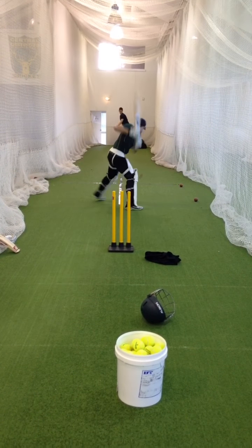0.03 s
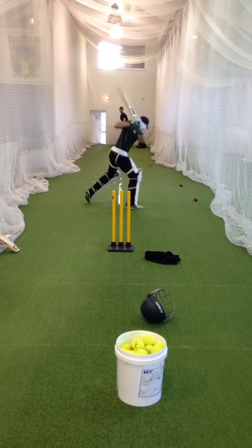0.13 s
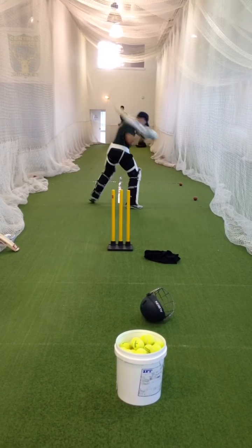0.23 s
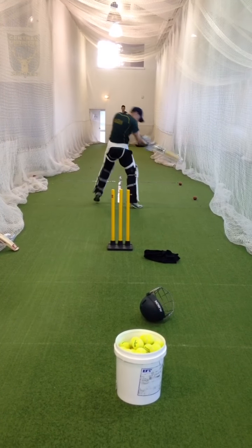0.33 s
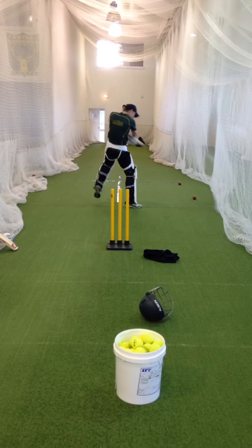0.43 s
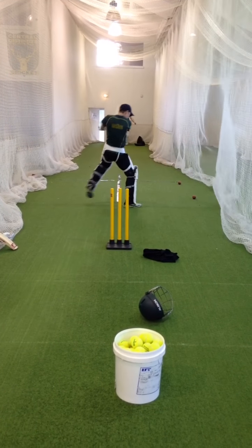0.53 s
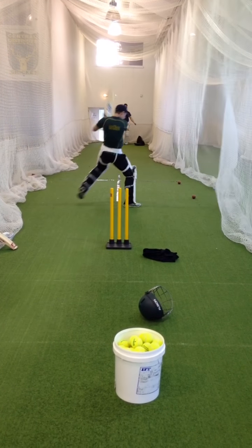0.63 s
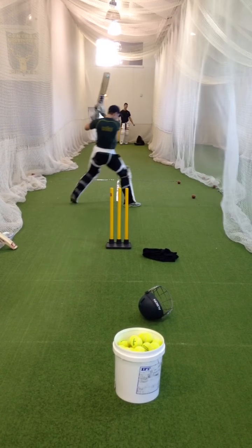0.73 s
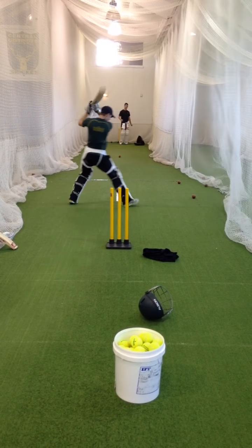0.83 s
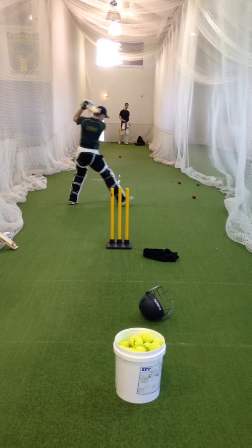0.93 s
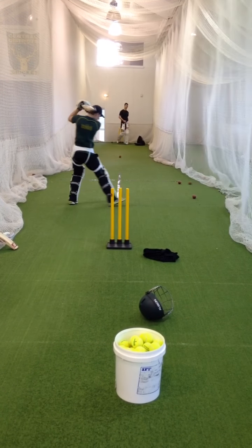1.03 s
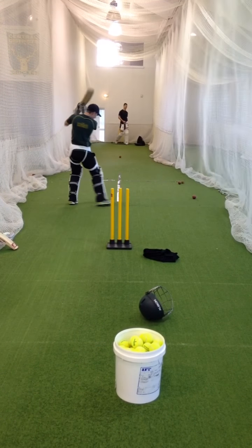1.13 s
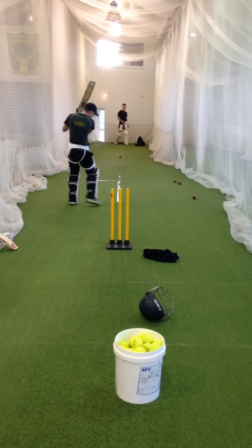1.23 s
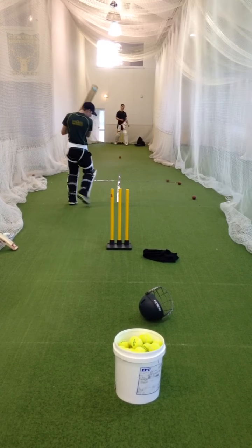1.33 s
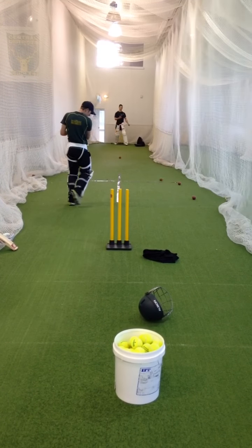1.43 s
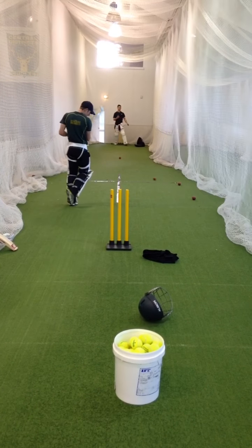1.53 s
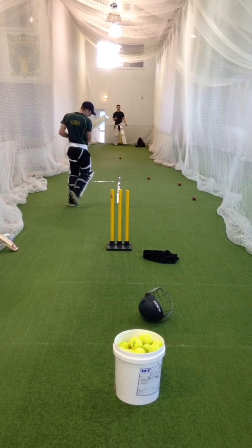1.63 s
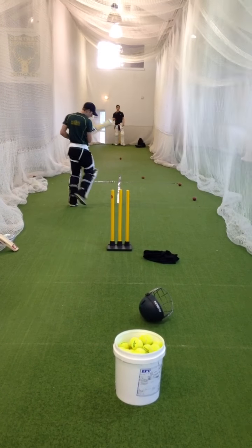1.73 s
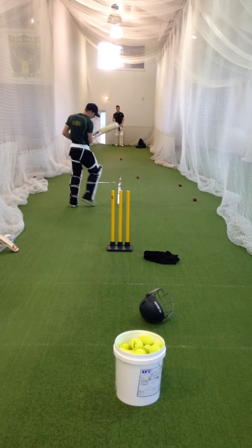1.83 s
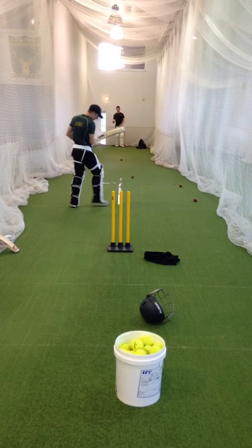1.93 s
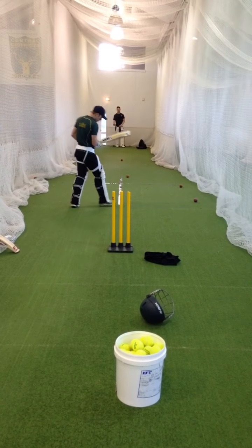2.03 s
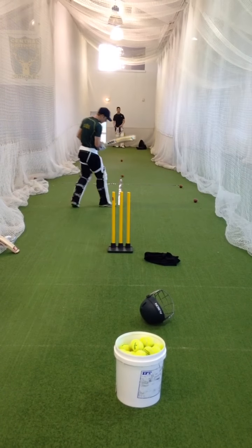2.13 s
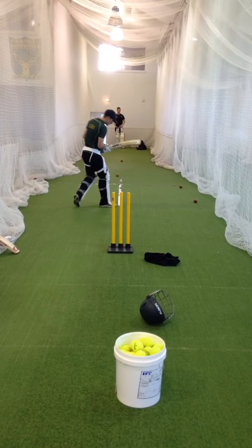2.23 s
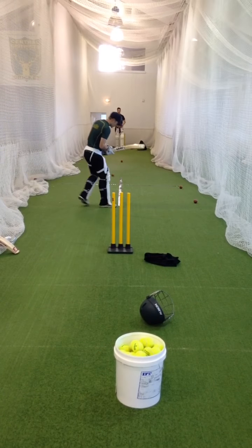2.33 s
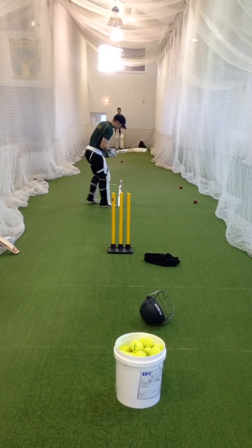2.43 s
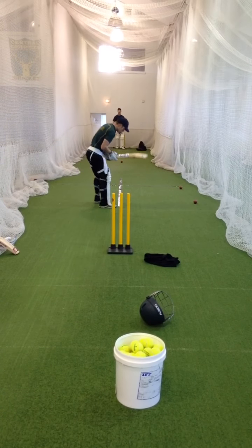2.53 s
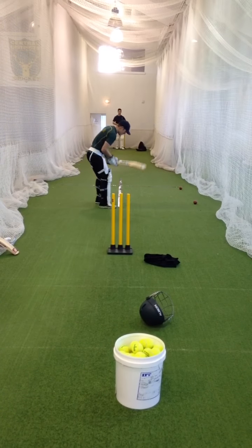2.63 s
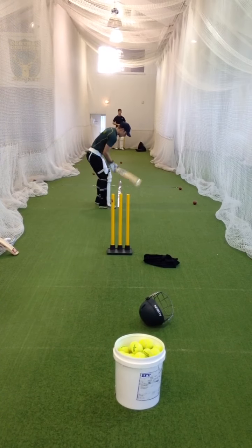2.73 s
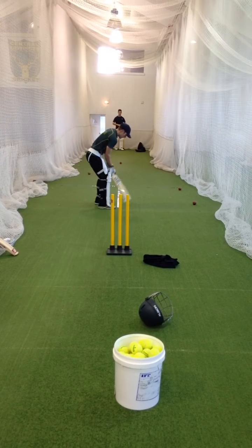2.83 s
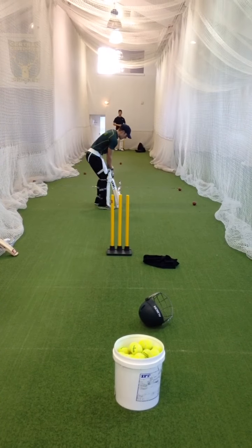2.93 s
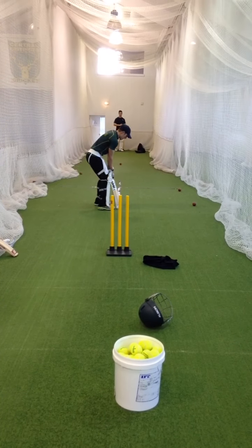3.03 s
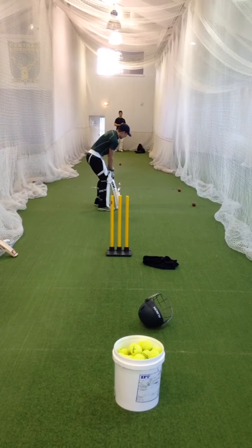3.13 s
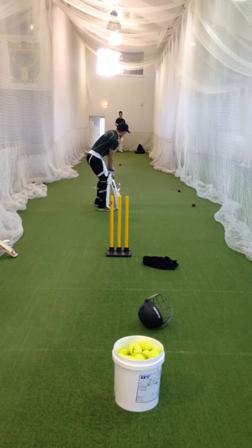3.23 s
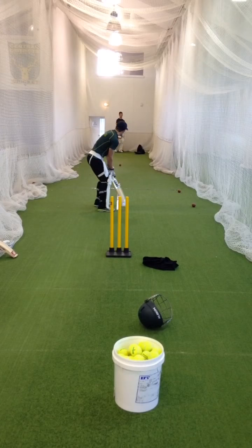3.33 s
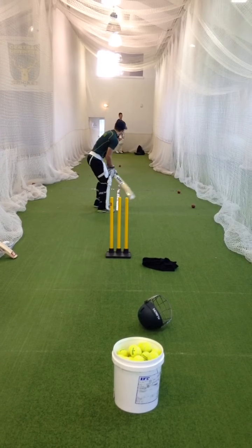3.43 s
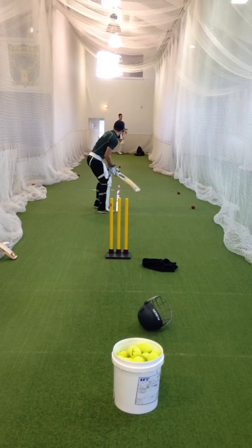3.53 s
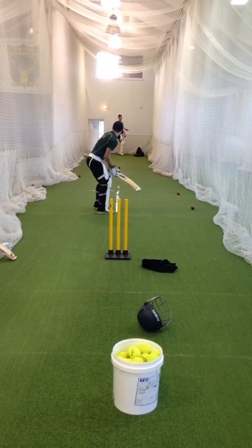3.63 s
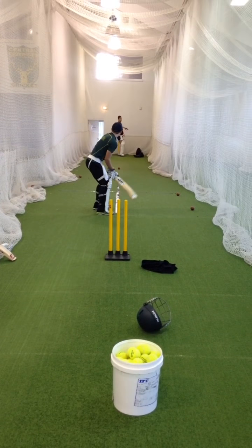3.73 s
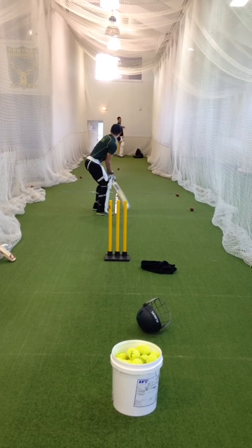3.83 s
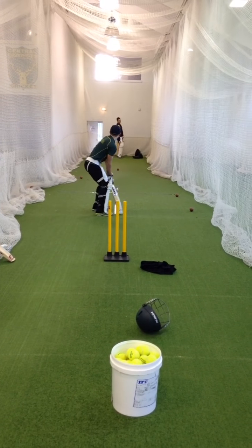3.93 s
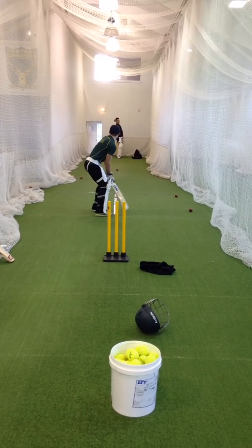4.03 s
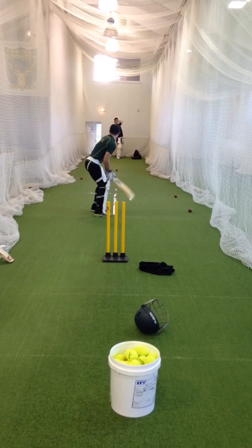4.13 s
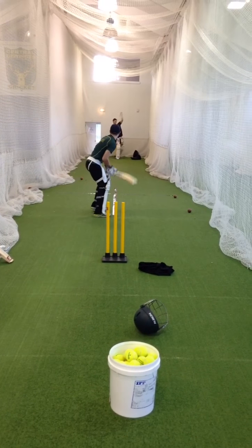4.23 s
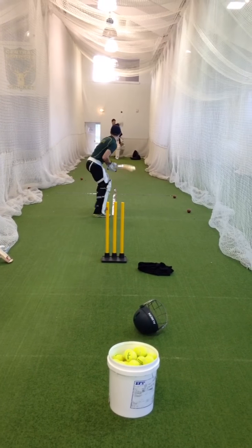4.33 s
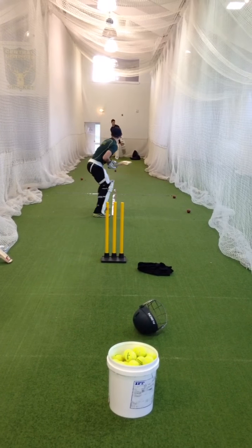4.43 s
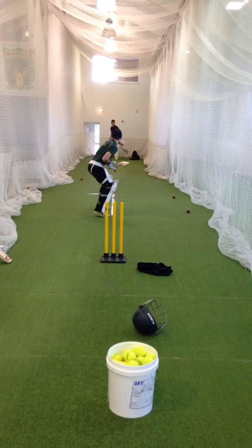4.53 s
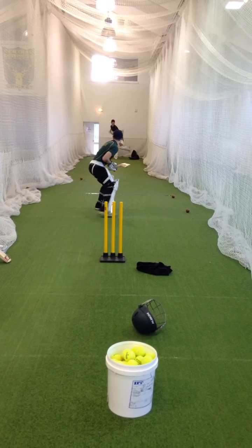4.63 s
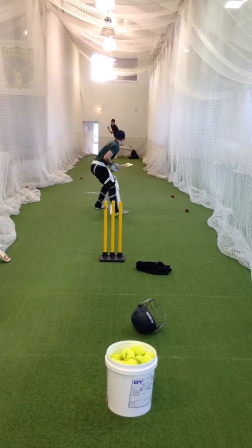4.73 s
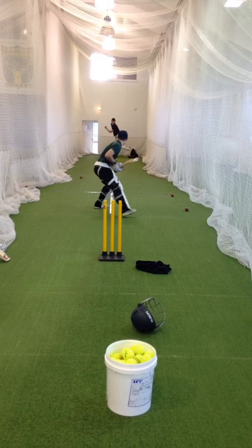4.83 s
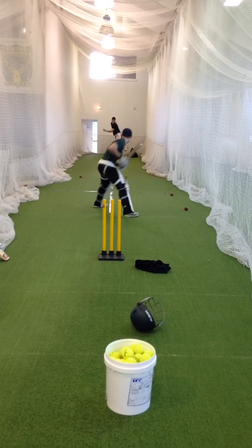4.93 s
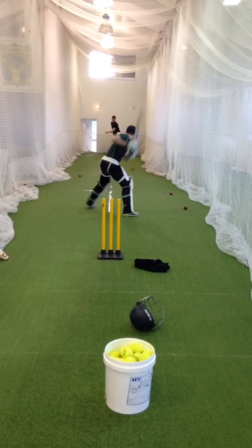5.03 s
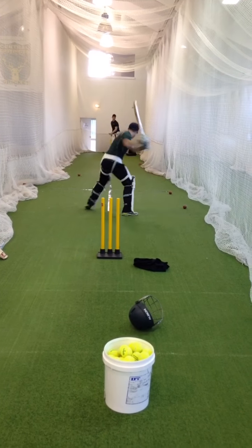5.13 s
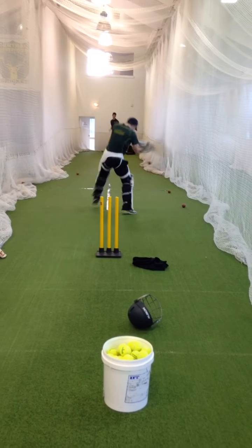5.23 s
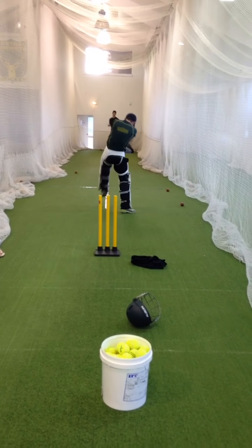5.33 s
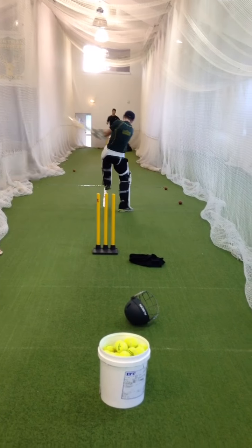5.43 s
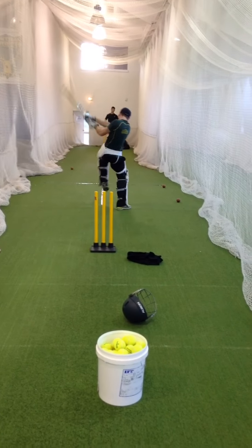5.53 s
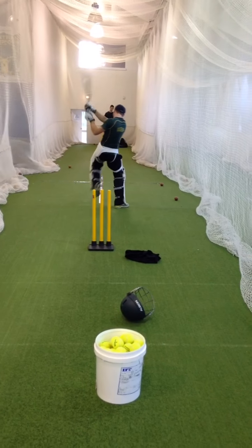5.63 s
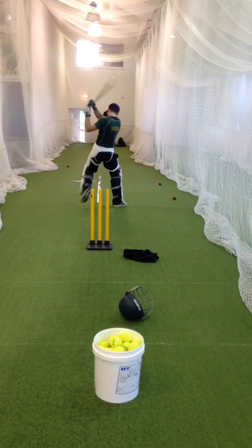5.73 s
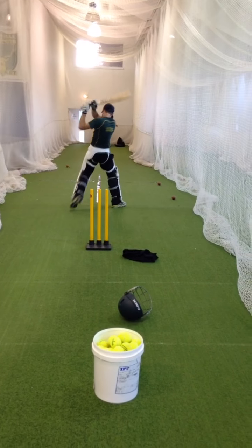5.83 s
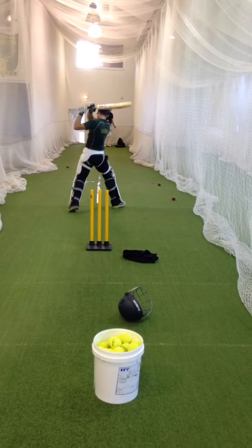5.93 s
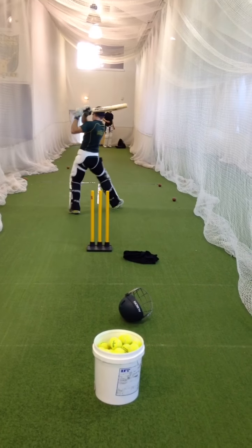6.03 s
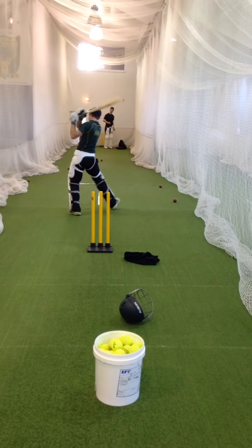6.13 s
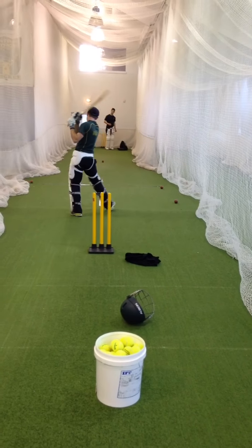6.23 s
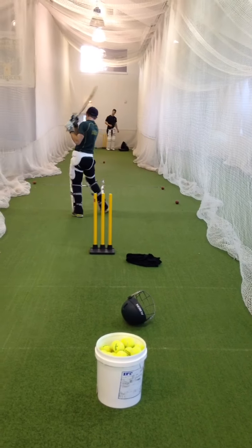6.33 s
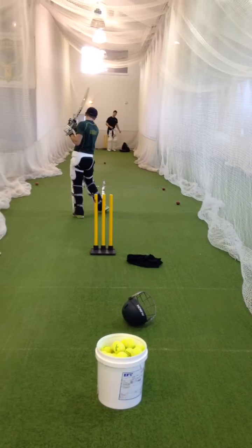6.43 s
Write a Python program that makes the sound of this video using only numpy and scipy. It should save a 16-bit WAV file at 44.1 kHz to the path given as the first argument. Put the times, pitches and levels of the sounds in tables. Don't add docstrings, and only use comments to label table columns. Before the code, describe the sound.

In a long, echoing netted hall, a ball pitches with a low boom on turf over a hollow floor, then a cricket bat cracks it loudly. Slapping echoes and a long tail fade under faint footsteps and scuffs. The bat taps the floor firmly, then more softly, before a second boom and crack. One microphone a few metres behind the batter; ventilation hums quietly.

```python
import sys
import numpy as np
from scipy import signal
from scipy.fft import rfft, irfft, next_fast_len
from scipy.io import wavfile
from scipy.ndimage import uniform_filter1d

SR = 44100
rng = np.random.default_rng(int(sys.argv[2]) if len(sys.argv) > 2 else 0)


def voltage_ratio(decibels):
    exponent = np.asarray(decibels, float) / 20
    return 10 ** exponent


def transcribe(signal):
    frames = np.atleast_2d(signal).T
    limited = np.clip(frames, -1, 1)
    pcm = np.round(limited * 32767).astype(np.int16)
    wavfile.write(sys.argv[1], SR, pcm)


N = 286164

# arrival in seconds, peak in dB.
FIRST_CRACK = [
    (0.4219, 1),
    (0.4233, 2),
    (.4305, -8),
    (.435, -3.5),
    (.438, -5.5),
    (0.457, -7.5),
    (0.483, -6),
    (.524, -6),
]
SECOND_CRACK = [
    (5.3706, 3),
    (5.372, -1),
    (5.3788, 0.5),
    (5.3833, 0),
    (5.3855, -6),
    (5.418, -8),
    (5.4424, -12),
    (5.4658, -5),
    (5.469, -10),
]
# frequency in Hz, level in dB per Hz.
FIRST_CRACK_COLOUR = [(260, -34.5), (450, -9.5), (1140, -10.5), (1470, -8), (1920, -21), (2470, -16.5),
                      (2910, -28.5), (10700, -39.5), (14800, -50.5), (16000, -78)]
SECOND_CRACK_COLOUR = [(260, -42), (450, -9), (607, -5.5), (1010, -8), (1420, -7), (2790, -22.5),
                       (4490, -26), (13600, -39), (15300, -53), (16000, -89)]
# frequency in Hz, width in Hz, lift in dB.
FIRST_BLADE = [(750, 290, 4.5), (1400, 280, 6.5), (2250, 210, 1.5), (3800, 1100, 10)]
SECOND_BLADE = [(680, 310, 3), (1400, 320, 2.5), (2450, 250, 4), (3900, 770, 2)]


def cracks():
    first = blow(-knock(FIRST_CRACK_COLOUR, FIRST_BLADE), blurred(FIRST_CRACK, late_ms=3.0),
                 tail(rise_s=0.0089, hold_s=0.17, mixing_s=0.08, patchy_db=2.5),
                 tail_db=-28.0, floor_lead_db=-57, split_hz=1500, treble_db=2.0)
    second = blow(knock(SECOND_CRACK_COLOUR, SECOND_BLADE), blurred(SECOND_CRACK, late_ms=1.8),
                  tail(rise_s=0.024, hold_s=0.15, mixing_s=0.12),
                  tail_db=-28.5, floor_lead_db=-38, split_hz=1100, treble_db=0.6)
    return first + second


def blurred(arrivals, late_ms):
    sharp_ms, blur_s = 0.5, 0.0057
    first_s = arrivals[0][0]
    return [(s, db, sharp_ms + late_ms * (1 - np.exp(-(s - first_s) / blur_s))) for s, db in arrivals]


# start in seconds, peak in dB, fade of its echoes in dB per second.
PITCHES = [
    (0.098, -3.5, 16.5),
    (4.9905, -5.5, 71),
]
# frequency in Hz, level in dB per Hz.
FIRST_PITCH_COLOUR = [(18, -54), (30, -18.5), (82, -8), (167, -1), (283, 1), (326, 3), (424, -2.5),
                      (456, -4.5), (717, -20), (808, -17), (1160, -28.5), (1470, -42), (9000, -79.5),
                      (11700, -107), (19800, -120)]
SECOND_PITCH_COLOUR = [(18, -45), (30, -14), (126, -3.5), (175, -0.5), (276, -1.5), (368, -2.5), (414, -9),
                       (607, -10), (684, -21), (868, -18), (1650, -45.5), (2360, -51.5), (9000, -85),
                       (11700, -102), (19800, -120)]


def pitches():
    first = blow(knock(FIRST_PITCH_COLOUR, [(1160, 200, 2.9)]), flutter(*PITCHES[0], count=7),
                 tail(rise_s=0.0013, hold_s=0.15, mixing_s=0.056, patchy_db=0.7),
                 tail_db=-28.5, floor_lead_db=-37, split_hz=1150, treble_db=-10.0)
    second = blow(knock(SECOND_PITCH_COLOUR, [(1070, 400, 1.8)]), flutter(*PITCHES[1], count=7),
                  tail(rise_s=0.0064, hold_s=0.13, mixing_s=0.05, patchy_db=1.5),
                  tail_db=-31, floor_lead_db=-33.5, split_hz=800, treble_db=2.5)
    return first + second


def flutter(s, db, fade_db_per_s, count):
    turf_s, wall_s, round_s, scatter_ms = 0.009, 0.026, 0.0215, 6.0
    lags = np.r_[0, turf_s, wall_s + round_s * np.arange(count)]
    return [(s + lag, db - fade_db_per_s * lag - 2.5 * (k % 2), scatter_ms) for k, lag in enumerate(lags)]


# start in seconds, peak in dB, favoured note in Hz, its lift in dB.
TAPS = [
    (2.994, -14, 305, 2.5),
    (3.999, -23.5, 121, 4),
]
# delay in seconds, level in dB.
TAP_ECHOES = [(0, 0), (0.027, 1), (0.047, -0.5), (.064, 1.5), (.088, 0.5), (0.12, -0.5), (0.152, 1.5),
              (.212, -3.5), (.234, -6), (0.29, -19)]
# frequency in Hz, level in dB per Hz.
TAP_COLOUR = [(18, -52), (30, -25), (49, -5), (80, -4), (185, 1), (250, -5.5), (278, -7.5), (359, -13.5),
              (475, -29.5), (528, -32.5), (1120, -49.5), (5000, -64.5), (6500, -81), (11000, -120)]


def taps():
    response = tail(rise_s=0.0099, hold_s=0.046, mixing_s=0.1, patchy_db=1.2)
    out = np.zeros(N)
    for s, db, hz, lift_db in TAPS:
        pulse = knock(TAP_COLOUR, [(hz, 0.96 * hz, lift_db)])
        arrivals = [(s + lag, db + echo_db, 3.9 + 100 * lag) for lag, echo_db in TAP_ECHOES]
        out += blow(pulse, arrivals, response, tail_db=db - 27.5, floor_lead_db=db - 35.0,
                    split_hz=690, treble_db=-11)
    return out


# start in seconds, peak in dB, note in Hz.
RINGS = [(0.0983, -17, 890), (.104, -6, 380), (1.799, -43, 2120), (2.996, -46, 1230), (2.9936, -14, 179),
         (3.007, -34, 711), (3.9985, -19, 165), (4.287, -28, 81.4), (4.515, -48, 2210), (4.652, -51, 1480),
         (4.99, -15, 954), (5.001, -5, 544)]
# start in seconds, note in dB, bright overtone in dB.
SLAPS = [
    (.4222, -5, -30),
    (.437, -15, -11),
    (.483, -30, -19.5),
    (5.3701, -1, -28),
    (5.3831, -4, -33),
    (5.443, -32, -12),
    (5.468, -30, -15),
]


def rings():
    t = np.arange(4096) / SR
    partials = [(s, db, hz, 0.023) for s, db, hz in RINGS]
    for s, note_db, bright_db in SLAPS:
        for db, hz in [(note_db, 1200), (bright_db, 4230), (bright_db - 7.5, 7700)]:
            partials.append((s, db, hz, 0.021))
    out = np.zeros(N)
    for s, db, hz, t60_at_1k in partials:
        t60 = t60_at_1k * (1000 / hz) ** 0.65
        onset = np.minimum(t * hz * 1.4, 1)
        i = round(s * SR)
        out[i:i + len(t)] += voltage_ratio(db - 60 * t / t60) * np.sin(2 * np.pi * hz * t) * onset
    return out


def knock(colour, modes=()):
    hz = np.fft.rfftfreq(8192, 1 / SR)
    db = at_hz(colour, hz)
    for mode_hz, width_hz, lift_db in modes:
        db = db + lift_db / (1 + (2 * (hz - mode_hz) / width_hz) ** 2)
    cepstrum = irfft(np.log(voltage_ratio(db)))
    cepstrum[1:4096] *= 2
    cepstrum[4097:] = 0
    pulse = irfft(np.exp(rfft(cepstrum)))
    return pulse / np.abs(pulse).max()


def blow(pulse, arrivals, response, tail_db, floor_lead_db, split_hz, treble_db):
    at = [round(row[0] * SR) for row in arrivals]
    ms = np.arange(2048) * 1000 / SR
    clean, scattered = np.zeros(N), np.zeros(N)
    for i, (s, db, scatter_ms) in zip(at, arrivals):
        clean[i] = voltage_ratio(db)
        spread = rng.standard_normal(len(ms)) * np.exp(-ms / max(scatter_ms, 0.05))
        scattered[i:i + len(ms)] += voltage_ratio(db + treble_db) * spread / np.linalg.norm(spread)
    clicks = bandpass(clean, 18, split_hz) + bandpass(scattered, split_hz, SR / 2)
    start = at[0]
    span = min(len(response), N - start)
    clicks[start:start + span] += voltage_ratio(tail_db) * response[:span]
    lead = np.arange(min(start, 2000))
    swell = rng.standard_normal(len(lead)) * np.exp(-lead / (0.005 * SR))
    clicks[start - 1 - lead] += voltage_ratio(floor_lead_db) * swell
    return signal.fftconvolve(clicks, pulse)[:N]


# frequency in Hz, t60 in seconds.
HALL_T60 = [(40, 1.6), (90, 1.5), (130, 0.74), (200, 1.05), (350, 1.596), (700, 1.52), (1400, 1.364),
            (2800, 1.047), (5600, 0.66), (11000, 0.14), (16000, 0.32)]


def tail(rise_s, hold_s, mixing_s, patchy_db=2.0):
    count = 2 ** 17
    t = np.arange(count) / SR
    share = np.clip(0.12 + (t / mixing_s) ** 2, 0, 1)
    sparse = rng.standard_normal(count) * (rng.random(count) < share) / np.sqrt(share)
    hz, s, frames = signal.stft(sparse, SR, nperseg=512)
    hz = hz[:, None]
    hold = hold_s * np.clip(hz / 330, 0.4, 1) / (1 + hz / 30000)
    late = hold / 4 * np.logaddexp(0, 4 * (s - hold) / hold)
    common = rng.standard_normal(len(s))
    own = uniform_filter1d(rng.standard_normal(frames.shape), size=16, axis=0) * 4
    bunching_db = patchy_db * (common + 0.35 * own) * np.exp(-s / 0.48)
    fall_db = 60 * late / at_hz(HALL_T60, hz + 30)
    beyond_db = -20 - 0.6 * fall_db * (1000 / (hz + 300)) ** 0.12
    frames = frames * voltage_ratio(bunching_db) * (voltage_ratio(-fall_db) + voltage_ratio(beyond_db))
    return signal.istft(frames, SR)[1][:count] * (1 - np.exp(-t / rise_s))


# moment in seconds, peak in dB, length in seconds, board note in Hz.
STEPS = [(.004, -50, .02, 100), (.95, -45.5, .04, 86), (1.097, -51, .06, 80), (1.299, -42.5, .04, 75),
         (1.446, -46, 0.076, 75.8), (1.75, -56.5, 0.14, 120.2), (1.93, -55.5, 0.074, 68),
         (2.072, -52, 0.06, 76.5), (2.252, -58, 0.032, 100), (2.4, -58, 0.11, 110),
         (2.52, -57.5, 0.039, 68), (2.721, -52.5, 0.049, 100.2), (2.83, -48, 0.046, 100),
         (3.76, -61, .04, 70.1), (3.967, -57, .015, 90), (4.27, -44.5, .03, 85), (4.416, -53, 0.035, 80),
         (4.599, -55.5, .05, 45), (4.79, -70, .04, 80), (5.642, -47, .04, 89), (5.856, -62, .02, 80),
         (6.078, -47.5, 0.046, 90), (6.44, -49, 0.047, 90)]


def tread():
    t = np.arange(N) / SR
    rumble = voltage_ratio(-3.5) * rms_one(bandpass(rng.standard_normal(N), 55, 140))
    out = np.zeros(N)
    for s, db, length, hz in STEPS:
        away = np.where(t < s, (s - t) / 0.85, t - s)
        weight = uniform_filter1d(np.exp(-away / length), size=600)
        out += voltage_ratio(db) * weight * (rumble + np.sin(2 * np.pi * hz * (t - s)))
    return out


# start in seconds, level in dB, centre in Hz, length in seconds.
SCUFFS = [(0.375, -53, 2540, 0.015), (.389, -50, 4500, 0.0048), (0.409, -42.5, 3000, 0.012),
          (1.25, -54, 222, 0.037), (1.39, -53.5, 3700, 0.0091), (1.442, -55, 2000, 0.011),
          (1.695, -53, 7500, 0.0097), (1.693, -54, 2590, .004), (1.706, -58.5, 2600, 0.015),
          (1.798, -49, 1300, .004), (1.9, -58.5, 2600, 0.05), (2.027, -55, 3400, 0.022),
          (2.045, -57, 1500, .04), (2.067, -60, 378, 0.048), (4.109, -65.5, 1800, 0.018),
          (4.35, -64, 3900, .006), (4.515, -56, 4500, 0.0038), (4.638, -61.5, 4500, 0.015),
          (4.651, -51.5, 1400, 0.016), (4.655, -56, 520, 0.03), (4.748, -62, 800, 0.04),
          (5.032, -52, 4500, .006), (5.082, -56.5, 2300, 0.028), (5.166, -53.5, 3000, .015),
          (5.249, -62, 5000, .05), (5.36, -44, 3000, 0.0066), (6.075, -62.5, 5000, .04),
          (6.293, -61.5, 4000, .08), (6.38, -58.5, 1400, 0.13), (6.4, -52.5, 200, .08)]
# delay in seconds, level in dB, centre in Hz, length in seconds.
GRIT = [
    (.002, 0, 3000, 0.0066),
    (0.019, -3.5, 2100, 0.076),
    (0.041, -12, 4800, 0.026),
]
# start in seconds, level in dB.
GRIT_BLOWS = [
    (.098, -46),
    (2.996, -58),
    (4.022, -62.5),
    (4.992, -48),
]


def scuffs():
    t = np.arange(8192) / SR
    thrown = [(s + lag, db + part_db, hz, length) for s, db in GRIT_BLOWS for lag, part_db, hz, length in GRIT]
    out = np.zeros(N)
    for s, db, hz, length in list(SCUFFS) + thrown:
        grit = rng.standard_normal(len(t)) * np.sqrt(rng.exponential(1, len(t)))
        octaves = 0.56 + 8.0 * length
        edge = 2 ** (octaves / 2)
        rub = rms_one(bandpass(grit, hz / edge, hz * edge))
        rub = rub * np.minimum(t / 0.0027, 1) * np.exp(-t / length)
        i = round(s * SR)
        out[i:i + len(t)] += voltage_ratio(db) * rub[:N - i]
    response = tail(rise_s=0.015, hold_s=0.12, mixing_s=0.05)
    return out + voltage_ratio(-41) * signal.fftconvolve(out, response)[:N]


# frequency in Hz, level in dB per Hz.
AIR = [(15, -38), (25, -2.5), (59, 1.5), (114, -1), (256, -6.5), (309, -10), (427, -17.5), (607, -18.5),
       (840, -22), (1740, -25.5), (4030, -25), (15300, -30), (16000, -48.5)]


def air():
    size = next_fast_len(N)
    spectrum = rfft(rng.standard_normal(size))
    colour = voltage_ratio(at_hz(AIR, np.fft.rfftfreq(size, 1 / SR)))
    return voltage_ratio(-55.5) * rms_one(irfft(spectrum * colour, size)[:N])


def at_hz(points, hz):
    table_hz, values = np.array(points).T
    return np.interp(np.log(np.maximum(hz, 1)), np.log(table_hz), values)


def rms_one(x):
    return x / np.sqrt(np.mean(x ** 2) + 1e-20)


def bandpass(x, low_hz, high_hz):
    sos = signal.butter(2, [low_hz, min(high_hz, 0.45 * SR)], "band", fs=SR, output="sos")
    return signal.sosfilt(sos, x)


def scene():
    mix = cracks() + pitches() + taps() + rings() + tread() + scuffs() + air()
    return mix[None]


def duck(x, knee_db, slope, back_db_per_s, attack_s):
    creep = back_db_per_s * np.arange(N) / SR
    heard = uniform_filter1d(bandpass(x[0], 890, 9000) ** 2, size=2048)
    over = slope * np.maximum(10 * np.log10(heard + 1e-12) - knee_db, 0)
    held = np.maximum.accumulate(over + creep) - creep
    r = np.exp(-1 / (attack_s * SR))
    return x * voltage_ratio(-signal.lfilter([1 - r], [1, -r], held))


def roll_off(x):
    return signal.sosfilt(signal.butter(12, 16340, fs=SR, output="sos"), x)


def record(dry):
    x = signal.sosfilt(signal.butter(2, 32, "high", fs=SR, output="sos"), dry)
    x = duck(x, knee_db=-33.5, slope=0.31, back_db_per_s=1.43, attack_s=0.21)
    x = 1.13 * np.tanh(x / 1.05)
    x = signal.sosfilt(signal.cheby2(20, 60, 15800, fs=SR, output="sos"), x)
    return roll_off(x)


dry = scene()
out = record(dry)
transcribe(out)
```